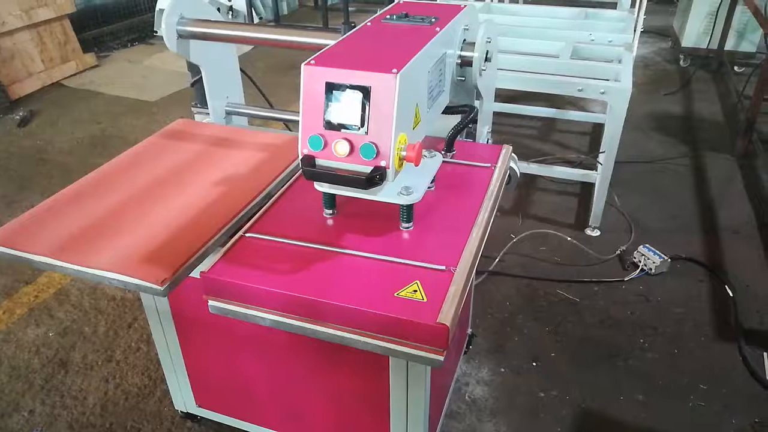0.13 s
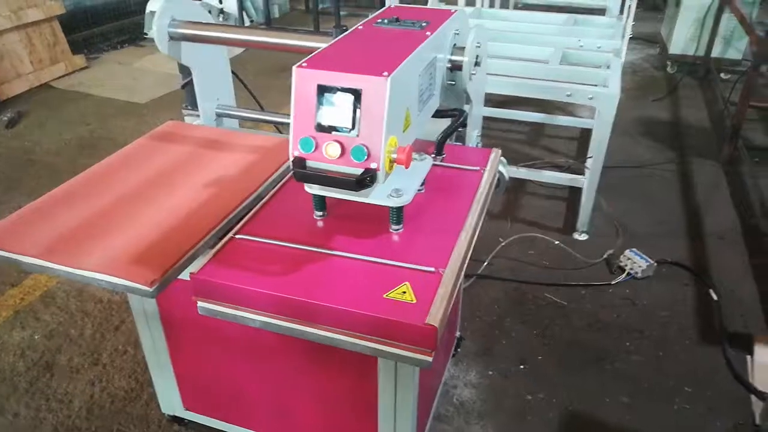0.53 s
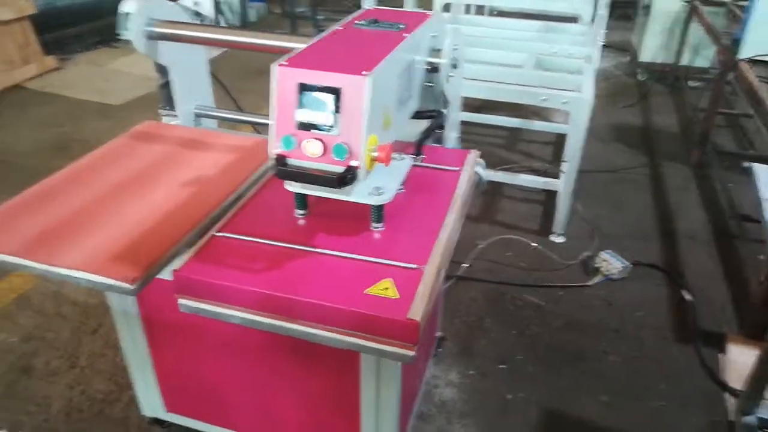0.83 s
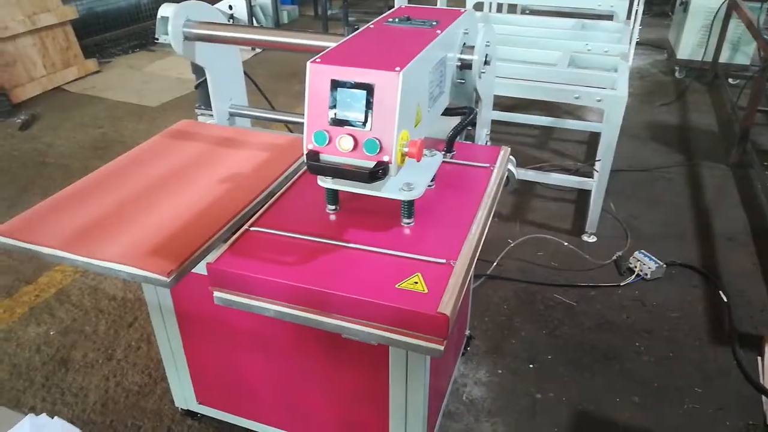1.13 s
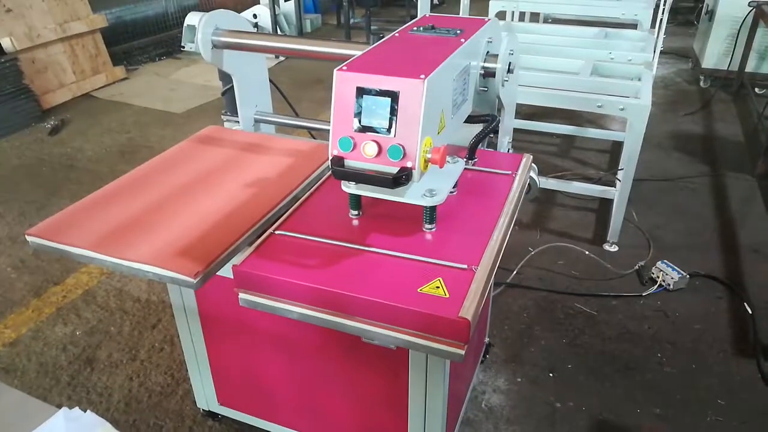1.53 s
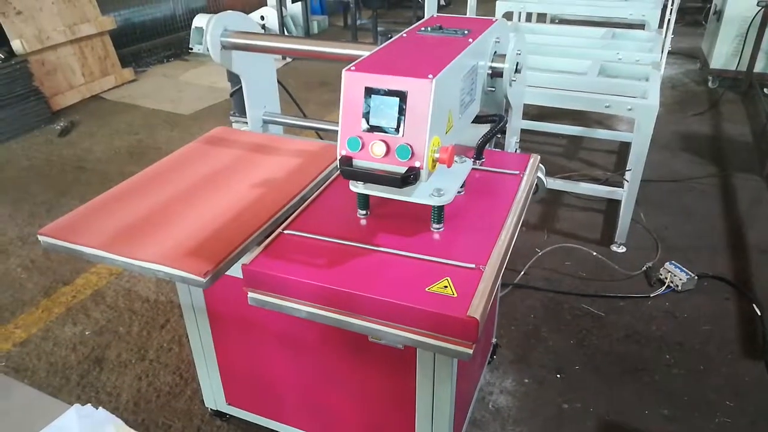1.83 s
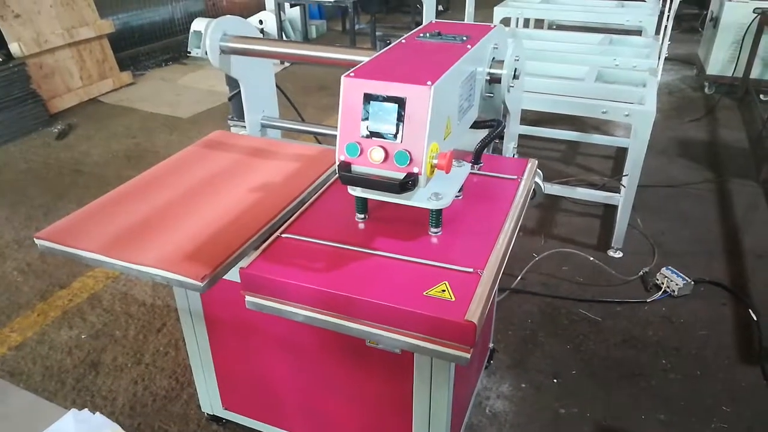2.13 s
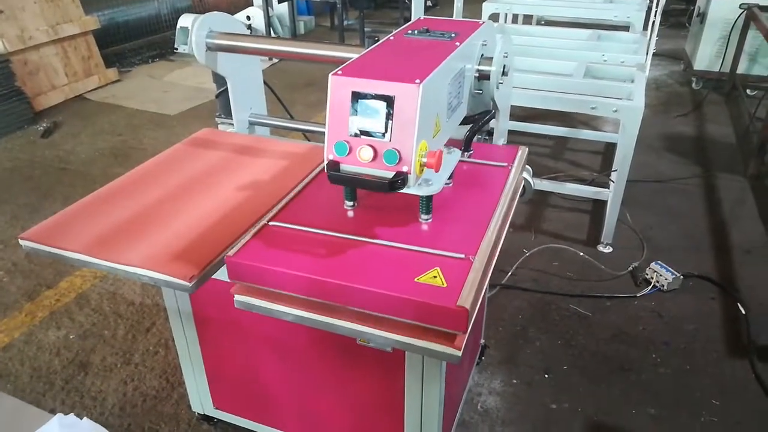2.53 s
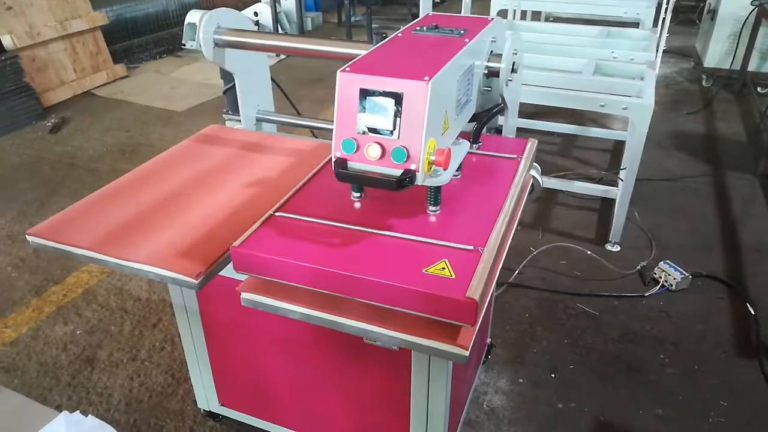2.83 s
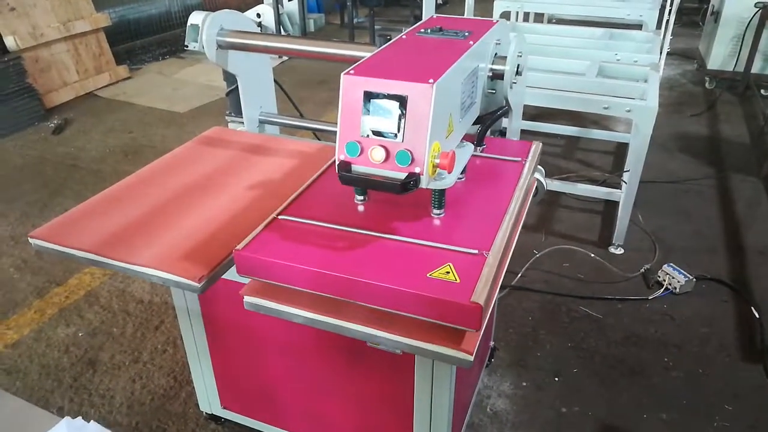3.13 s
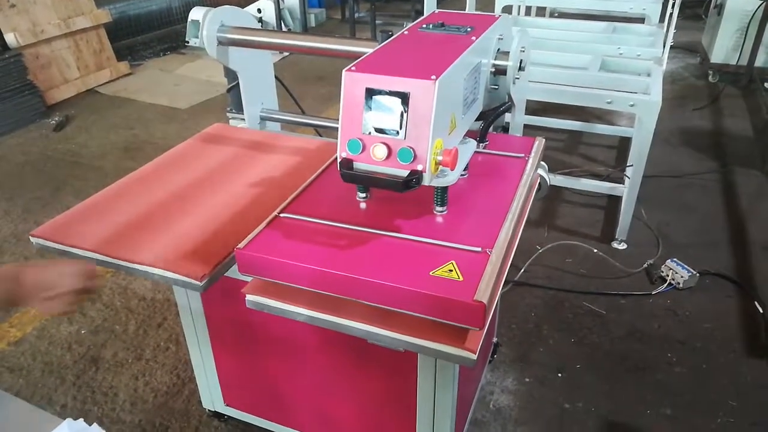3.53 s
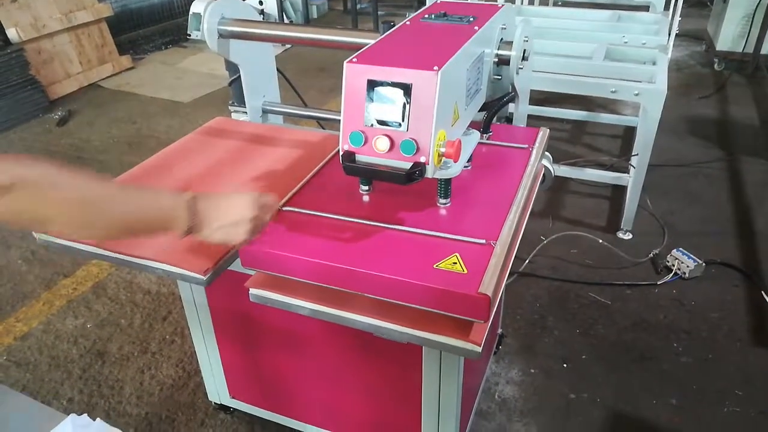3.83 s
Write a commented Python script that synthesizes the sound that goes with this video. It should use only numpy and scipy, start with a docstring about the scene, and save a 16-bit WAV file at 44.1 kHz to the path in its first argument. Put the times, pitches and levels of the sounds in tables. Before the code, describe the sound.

A pneumatic heat press releases a soft, weakening jet of air midway, ending in a duller puff, amid steady fan and machine roar with low hum; a draught rumbles and thumps on the nearby microphone.

```python
"""A pneumatic heat press vents its cylinder at two seconds, a weakening jet of noise, while the plate lifts.
Fans and machines fill the workshop: shaped noise for the roar, narrow resonances for hum, a wavering drone.
A thin hiss of air swells and fades, with sizzling swells on top and faint whistles of resonant noise.
A draught buffets the microphone: low rumble, gusts and single pressure thumps.
The gain ducks when the sound is loud, as in the strongest gusts; the sound cuts in abruptly after silence."""
import sys
import numpy as np
from scipy import signal
from scipy.fft import rfft, irfft
from scipy.io import wavfile
from scipy.ndimage import uniform_filter1d

SR = 44100
rng = np.random.default_rng(int(sys.argv[2]) if len(sys.argv) > 2 else 0)


def store_wav(level_fs):
    """Save 16-bit WAV to argv[1]."""
    pcm = np.round(np.clip(np.atleast_2d(level_fs), -1, 1) * 32767)
    wavfile.write(sys.argv[1], SR, pcm.T.astype(np.int16))


N = 176400
T = np.arange(N) / SR
HZ = np.maximum(np.arange(N // 2 + 1) * SR / N, 1)


def from_db(db):
    """Decibels to amplitude gain."""
    return 10 ** (np.asarray(db) / 20)


def rms_one(x):
    """Scale to an RMS level of one over all channels."""
    return x / np.sqrt(np.mean(x ** 2) + 1e-20)


def in_time(rows):
    """Draw a control curve through (time, value) points."""
    return np.interp(T, *np.transpose(rows))


def per_hz(rows):
    """Read a (frequency, value) table at every spectrum bin, on a log-frequency axis."""
    hz, value = np.transpose(rows)
    return np.interp(np.log(HZ), np.log(hz), value)


def coloured(x, spectrum):
    """Filter x by a spectrum in dB, then bring it to unit level."""
    shaped = rfft(x) * from_db(per_hz(spectrum))
    return rms_one(irfft(shaped, N))


def white_stereo():
    """Independent white noise for left and right."""
    return rng.standard_normal((2, N))


def narrow(hz, width_hz, channels):
    """Noise in a sharp resonance, heard as a wavering tone; width is taken at half amplitude."""
    resonance = 1 / (1 + (2 * (HZ - hz) / width_hz) ** 2)
    noise = rng.standard_normal((channels, N))
    return rms_one(irfft(rfft(noise) * resonance, N))


def drift(corner_hz):
    """Low-passed noise of unit spread, a slow random modulator at half amplitude by the corner."""
    noise = rng.standard_normal(N)
    return rms_one(irfft(rfft(noise) / (1 + (HZ / corner_hz) ** 2), N))


def pan(db):
    """Left and right gains for a level difference; positive leans left."""
    return from_db(np.array([[db], [-db]]) / 2)


def bump(centre_s, spread_s):
    """A smooth Gaussian swell of height one."""
    return np.exp(-.5 * ((T - centre_s) / spread_s) ** 2)


def opening(start_s, end_s):
    """Air flow through an opening: quick rise, hold, then exponential dying away."""
    attack_s, release_s = 0.0065, 0.09
    rise = np.clip((T - start_s) / attack_s, 0, 1)
    return rise * np.exp(-np.maximum(T - end_s, 0) / release_s)


def workshop():
    """Diffuse roar of fans and machines, most alike between the ears in the bass, with a motor hum."""
    # colour of the roar: (frequency [Hz], relative level per Hz [dB])
    roar_spectrum = [(20, -26), (42, -7), (72, -9), (160, -3.5), (280, -7.5), (400, -6), (540, -11.5),
                     (760, -9.5), (1200, -9.5), (1750, -13.5), (2400, -14), (3000, -16), (3900, -15.5),
                     (5500, -19.5), (7700, -19), (10200, -35.5), (15500, -50)]
    # its loudness: (time [s], level [dB])
    roar_level = [(.3, -31), (.7, -31.5), (1.1, -32.5), (1.6, -34), (2.4, -34), (3.2, -34), (4, -33.5)]
    # left-right correlation: (frequency [Hz], likeness [-1 to 1])
    likeness = [(60, .98), (130, 1), (250, 0.94), (450, 0.18), (700, -0.28), (1200, 0.33), (2200, -0.069),
                (8000, 0.026)]
    # motor hum tones: (frequency [Hz], level [dB])
    hum_tones = [(119, -43), (376, -47)]
    hum_width_hz = 12.2

    alike = np.clip(per_hz(likeness), -.99, .99)
    mid, side = rfft(white_stereo())
    shared = np.sqrt(1 + alike) * mid
    spread = np.sqrt(1 - alike) * side * [[1], [-1]]
    field = irfft(shared + spread, N)
    roar = coloured(field, roar_spectrum) * from_db(in_time(roar_level)) * pan(db=-1.0)
    hum = sum(from_db(db) * narrow(hz, hum_width_hz, channels=1) for hz, db in hum_tones)
    return roar + hum


def drone():
    """Machines across the workshop: low noise alike in both ears, with a random waver in level."""
    # colour of the drone: (frequency [Hz], relative level per Hz [dB])
    drone_spectrum = [(30, -16), (70, -2), (115, 1), (150, 1.5), (190, 2.5), (260, -1), (400, 0),
                      (500, -13.5), (700, -28), (5000, -80)]
    # its loudness before the waver: (time [s], level [dB])
    drone_level = [(.28, -39), (.36, -33.5), (.72, -34), (.84, -37.5), (.92, -37.5), (1.15, -38),
                   (4, -44.5)]
    waver_limit_db, waver_corner_hz = 2.5, 15

    waver_db = waver_limit_db * np.tanh(drift(waver_corner_hz))
    tone = coloured(rng.standard_normal(N), drone_spectrum)
    return tone * from_db(in_time(drone_level) + waver_db)


def draught():
    """Lumpy pressure on two ports: big eddies push both alike, small bright ones push them apart."""
    # steady strength of the draught: (time [s], level [dB])
    strength = [(1.0, -46.5), (1.14, -29), (1.4, -29), (1.65, -29), (1.9, -23), (2.18, -30), (2.35, -28),
                (2.5, -27), (2.68, -34), (2.82, -26.5), (2.96, -29), (3.15, -22.5), (3.42, -23), (3.6, -35),
                (3.8, -22), (4, -32.5)]
    # strong gusts: (time [s], level [dB], Gaussian spread [s], extra level of the opposed part [dB])
    gusts = [(1.306, -18, 0.009, 3), (1.341, -15.5, 0.019, 1.5), (1.485, -18.5, 0.011, 1.5),
             (1.863, -22.5, 0.017, 1), (1.925, -23.5, 0.0069, 0), (1.985, -20, 0.012, 5),
             (2.078, -18.5, .013, 5), (2.427, -21, 0.013, -1), (2.478, -18.5, 0.017, 3),
             (3.016, -19, 0.014, -2), (3.064, -18.5, 0.019, 0), (3.143, -18, 0.015, -6),
             (3.198, -17.5, 0.0098, 1), (3.279, -18, 0.014, 4.5), (3.713, -21, 0.016, 4.5),
             (3.766, -19, .016, 4), (3.959, -24.5, .008, 1), (3.99, -18, 0.0041, 0)]
    # rumble common to both ports: (frequency [Hz], relative level per Hz [dB])
    common_spectrum = [(15, -12), (35, -1), (70, 1), (130, -0.5), (230, -6.5), (370, -16.5), (550, -28.5),
                       (1000, -37.5), (8000, -90)]
    # rumble opposed between the ports: (frequency [Hz], relative level per Hz [dB])
    opposed_spectrum = [(20, -15), (60, -6), (130, 1.5), (250, 0.5), (420, -4.5), (600, -11), (900, -22.5),
                        (8000, -69)]
    opposed_db, eddy_spread_db, eddy_corner_hz = -7, 2.5, 53

    lumps_db = eddy_spread_db * np.clip(drift(eddy_corner_hz), -2, 2)
    common, opposed = white_stereo() * from_db(lumps_db)
    flow = from_db(in_time(strength))
    deep_gusts = sum(from_db(db) * bump(s, spread) for s, db, spread, _ in gusts)
    bright_gusts = sum(from_db(db + more_db) * bump(s, spread) for s, db, spread, more_db in gusts)
    # gusts add to the flow in power
    deep = np.hypot(flow, deep_gusts)
    bright = np.hypot(flow, bright_gusts)
    rumble = deep * coloured(common, common_spectrum)
    flutter = from_db(opposed_db) * bright * coloured(opposed, opposed_spectrum) * [[1], [-1]]
    return rumble * pan(db=-0.3) + flutter * pan(db=5.5)


def leak():
    """A thin hiss of air, turbulent noise that swells now and then into a sizzle."""
    # colour of the hiss: (frequency [Hz], relative level per Hz [dB])
    hiss_spectrum = [(1500, -2.5), (3700, -7), (5500, -15), (6800, -2.5), (7900, 0.5), (9000, -8),
                     (10500, -27), (15500, -46)]
    # its loudness: (time [s], level [dB])
    hiss_level = [(.28, -46.5), (.47, -42.5), (.62, -45), (.78, -43), (1.05, -38), (1.25, -44.5),
                  (1.42, -48), (1.72, -46), (1.95, -50), (3.0, -52), (3.2, -46.5), (3.4, -50), (4, -48.5)]
    # swells of the sizzling top: (time [s], level [dB], Gaussian spread [s])
    swells = [(.46, -48, 0.098), (1.06, -45, 0.12), (1.716, -45, 0.088), (2.18, -51, .11), (3.2, -53, 0.1)]
    # colour of the sizzle: (frequency [Hz], relative level per Hz [dB])
    sizzle_spectrum = [(8500, 3), (11000, -4), (12000, -4), (12900, 1.5), (13800, -5), (15500, -26)]

    hiss = coloured(white_stereo(), hiss_spectrum) * from_db(in_time(hiss_level))
    swell = sum(from_db(db) * bump(s, spread) for s, db, spread in swells)
    sizzle = swell * coloured(white_stereo(), sizzle_spectrum)
    return hiss * pan(db=-11.5) + sizzle * pan(db=-5)


def whistles():
    """Faint edge tones in the escaping air, made of narrow resonant noise."""
    # (start [s], start of decay [s], frequency [Hz], width [Hz], level [dB], left over right [dB])
    edge_tones = [(.36, .46, 6580, 70, -52, -3), (2.07, 2.38, 6900, 900, -42, 8),
                  (2.62, 2.8, 6950, 600, -48, 3)]
    total = np.zeros((2, N))
    for start, end, hz, width, db, side_db in edge_tones:
        tone = narrow(hz, width, channels=2) * opening(start, end)
        total += from_db(db) * tone * pan(db=side_db)
    return total


def thumps():
    """Single eddies on the microphone, each one push and pull of pressure; the shorter, the brighter."""
    # (time [s], peak level [dB], time from centre to peak [s], left over right [dB])
    single_eddies = [(1.137, -19.5, 0.0012, -4), (1.332, -24.5, 0.00057, 14), (1.412, -10.5, 0.0016, 7),
                     (1.88, -21, 0.0009, -4), (1.973, -17, 0.0008, -1), (2.494, -17.5, 0.0007, 2),
                     (3.28, -4, 0.0012, 3), (3.66, -23.5, 0.00049, 13), (3.71, -19, 0.00062, 3),
                     (3.75, -21.5, 0.00043, 10), (3.774, -10, 0.0011, -1), (3.955, -22.5, 0.00037, -14)]
    total = np.zeros((2, N))
    for s, db, half, side_db in single_eddies:
        # Gaussian slope scaled to a peak of one
        push_pull = (s - T) / half * np.exp(.5) * bump(s, half)
        total += from_db(db) * push_pull * pan(db=side_db)
    return total


def exhaust():
    """The valve opens and the cylinder vents; the jet noise weakens as the pressure falls."""
    # colour of the jet: (frequency [Hz], relative level per Hz [dB])
    jet_spectrum = [(800, -8.5), (2500, -5), (4200, -5.5), (5800, -4.5), (6900, -3), (8100, -1), (9200, -8),
                    (10600, -16), (13200, -18), (15500, -25)]
    open_s, shut_s = 2.03, 2.79
    opening_db, sag_db_per_s = -35, 9

    jet_db = opening_db - sag_db_per_s * (T - open_s)
    flow = opening(open_s, shut_s) * from_db(jet_db)
    return flow * coloured(white_stereo(), jet_spectrum) * pan(db=-0.5)


def last_puff():
    """The rest of the air leaves in a duller puff of noise as the plate nears the top."""
    # one swell: (time [s], level [dB], Gaussian spread [s])
    puff_swell = (2.73, -38, 0.1)
    # colour of the puff: (frequency [Hz], relative level per Hz [dB])
    puff_spectrum = [(600, -10), (1200, 0), (2200, 1), (3800, 1), (5500, -4), (8000, -1), (10500, -24),
                     (15500, -34)]
    s, db, spread = puff_swell
    return from_db(db) * bump(s, spread) * coloured(white_stereo(), puff_spectrum)


def echoes(x, count):
    """Hard surfaces near the microphone: weak early reflections, different per ear, ripple the spectrum."""
    nearest_s, farthest_s, echo_db = .002, 0.022, -23
    lags = (rng.uniform(nearest_s, farthest_s, (2, count)) * SR).astype(int)
    reflected = np.zeros((2, N))
    for ear in range(2):
        for lag in lags[ear]:
            reflected[ear] += np.pad(x[ear], (lag, 0))[:N]
    return x + from_db(echo_db) * reflected


def scene():
    """Mix at the microphone: roar, hum and air with echoes; drone, draught and thumps without."""
    air = leak() + whistles() + exhaust() + last_puff()
    return echoes(workshop() + air, count=6) + drone() + draught() + thumps()


def record(dry):
    """The gain ducks under loud sound and recovers; the start cuts in abruptly and the top is cut."""
    start_s, cutoff_hz = .279, 15750
    duck_above_db, duck_db_per_db, recovery_db_per_s = -18, 0.37, 20.5

    power = uniform_filter1d(np.mean(dry ** 2, axis=0), size=256)
    level_db = 10 * np.log10(np.maximum(power, 1e-12))
    duck_db = duck_db_per_db * np.maximum(level_db - duck_above_db, 0)
    # instant ducking, then recovery along a straight slope in dB
    slope_db = recovery_db_per_s * T
    duck_db = np.maximum.accumulate(duck_db + slope_db) - slope_db
    gain = from_db(-uniform_filter1d(duck_db, size=256))
    out = dry * gain * (T >= start_s)
    low_pass = signal.ellip(12, .1, 80, cutoff_hz, fs=SR, output="sos")
    return signal.sosfilt(low_pass, out)


dry = scene()
out = record(dry)
store_wav(out)
```